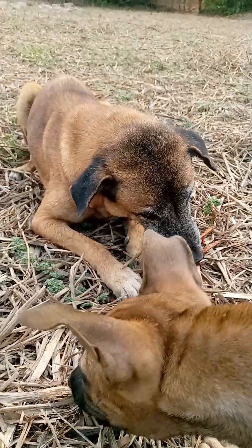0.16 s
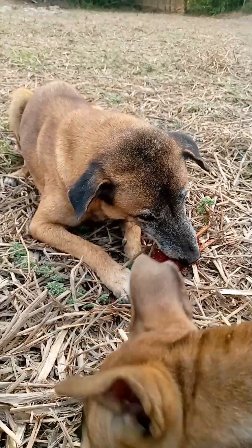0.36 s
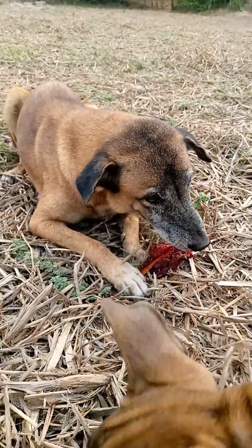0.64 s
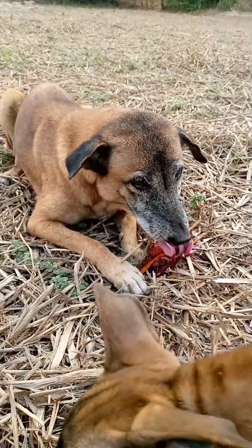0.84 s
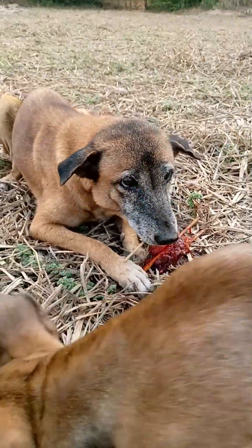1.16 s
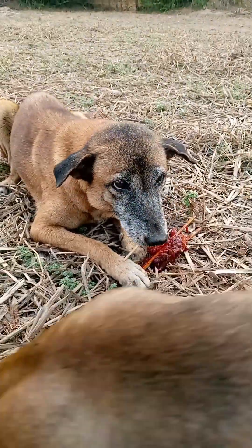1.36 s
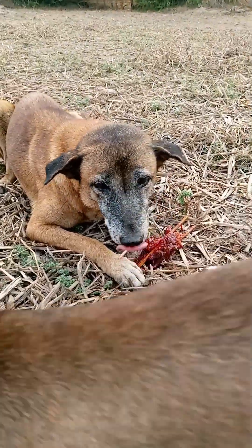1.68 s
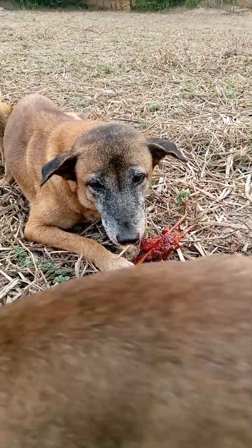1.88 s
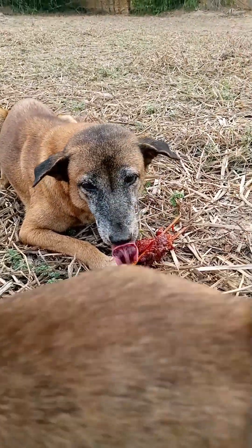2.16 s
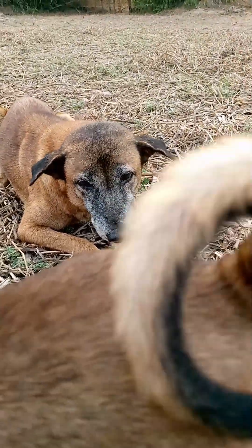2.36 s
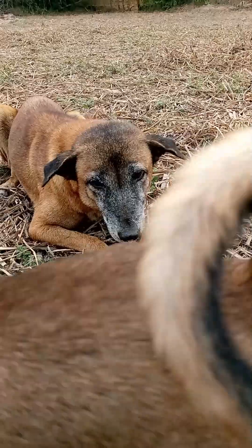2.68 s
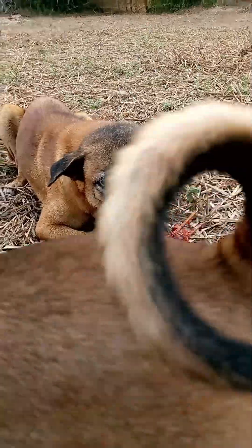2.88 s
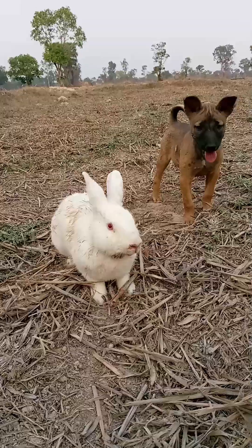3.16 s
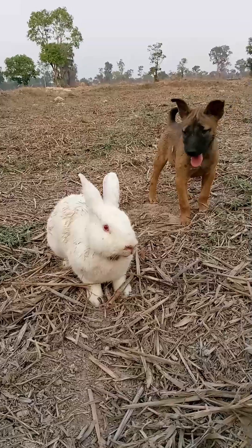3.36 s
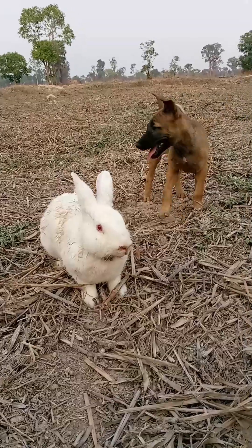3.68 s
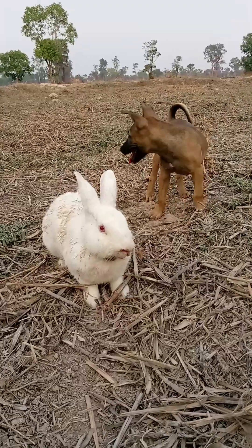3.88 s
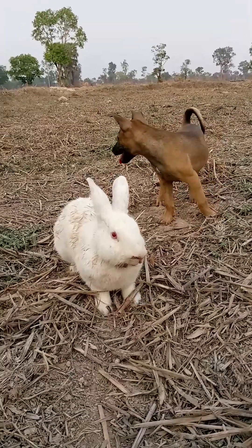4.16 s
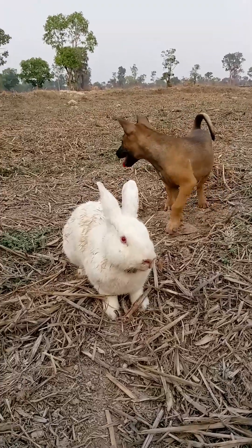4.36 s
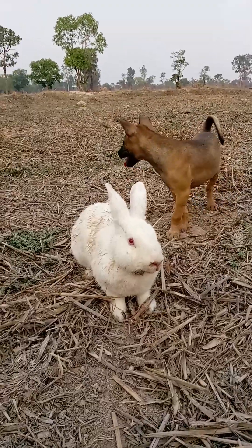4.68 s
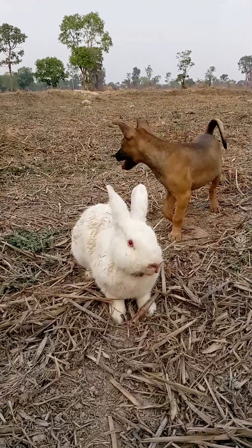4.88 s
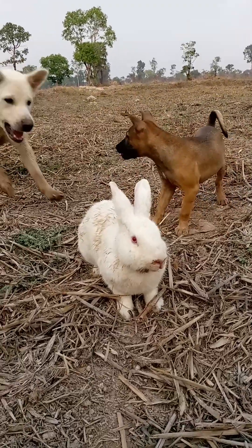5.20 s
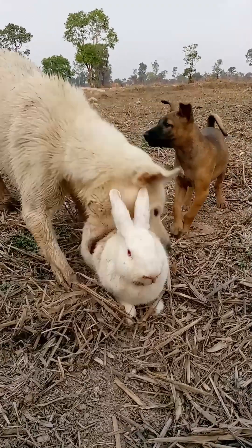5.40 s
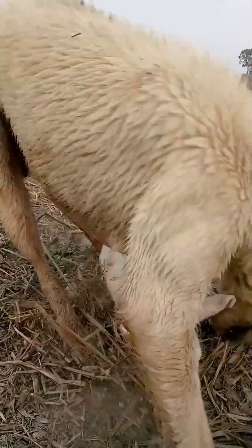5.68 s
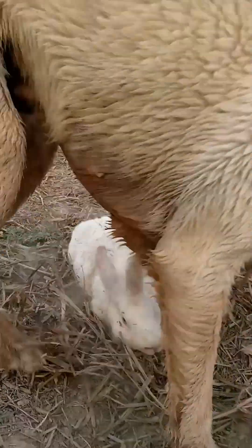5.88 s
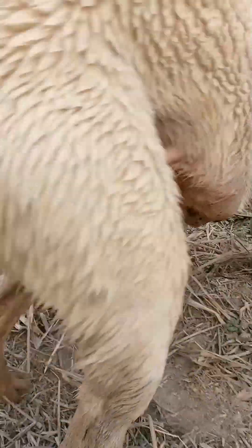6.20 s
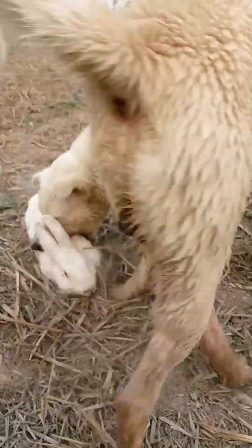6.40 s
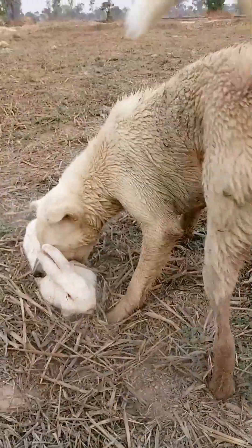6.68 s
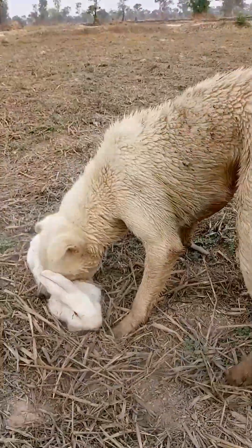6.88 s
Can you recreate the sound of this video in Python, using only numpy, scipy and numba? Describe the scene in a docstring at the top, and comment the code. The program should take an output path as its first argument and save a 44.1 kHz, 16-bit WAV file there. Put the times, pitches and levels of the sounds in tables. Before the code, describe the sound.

Dry straw crackles and crunches as a dog gnaws meat with low grumbles and a bird chirps; later a big dog tramples through loudly.

```python
"""A field of dry straw, with dogs close to a phone. One gnaws at meat while another brushes past with
low grumbles, and a bird repeats a rising chirp. After a short silence the field is quieter, with a puppy
shuffling, until a big dog trots in and crunches through the stalks. Straw, snaps and soil are shaped noise,
clacks are ringing modes, grumbles are throat pulses through resonances and the bird is a gliding sine.
The harder the straw is pressed, the brighter it crackles."""
import sys
import numpy as np
from scipy import signal
from scipy.fft import rfft, irfft, next_fast_len
from scipy.io import wavfile
from scipy.ndimage import uniform_filter1d
from numba import njit

SR = 44100
rng = np.random.default_rng(int(sys.argv[2]) if len(sys.argv) > 2 else 0)


def store_wav(level_fs):
    """Save 16-bit WAV to argv[1]."""
    pcm = np.round(np.clip(np.atleast_2d(level_fs), -1, 1) * 32767)
    wavfile.write(sys.argv[1], SR, pcm.T.astype(np.int16))


N = 310464
TIME = np.arange(N) / SR  # s

# colour of thin straw fibres breaking, as heard through the phone's microphone: f/Hz, level/dB
CRACKLE_COLOUR = [(900, -45), (2000, -14), (3000, -9.5), (3650, -6.5), (4420, -19), (5200, -9.5),
                  (6200, -3.5), (7200, -7), (8300, -12.5), (9700, -4.5), (11000, 1.5), (12200, -7.5),
                  (13700, -19), (15500, -18)]


def straw():
    """Thin fibres crackle brightly; thicker stalks crunch lower, partly in the same breaks; bumps are dull."""
    # constant stirring while the dog feeds, then while the others play: t/s, crackle level before flutter/dB
    stir_feeding = [(0, -42.5), (0.16, -50.5), (0.66, -56), (1.1, -43.5), (1.26, -49), (1.76, -48),
                    (1.88, -50), (2.16, -49.5), (2.4, -56.5), (3.03, -53.5)]
    stir_playing = [(3.17, -66.5), (3.4, -56.5), (3.8, -52.5), (4.25, -58), (5.25, -61.5), (5.5, -38),
                    (5.8, -45), (5.94, -39.5), (6.2, -53), (6.36, -50), (6.47, -44), (6.62, -54),
                    (6.85, -55), (7.04, -50)]
    # bites, tugs and steps that crush the straw: start t/s, length/s, crackle level before flutter/dB
    crushes = [(0.03, 0.058, -41), (0.19, 0.13, -47), (0.718, 0.081, -44), (0.862, 0.052, -38.5),
               (0.92, 0.067, -42.5), (1.349, 0.058, -35), (1.407, 0.064, -34.5), (1.588, 0.1, -39.5),
               (1.953, 0.079, -32.5), (2.166, 0.12, -41.5), (2.605, 0.032, -45.5), (2.841, 0.045, -39),
               (2.916, 0.027, -50), (3.493, 0.089, -50), (3.629, 0.068, -51), (4.008, 0.14, -46.5),
               (4.818, 0.0095, -53.5), (4.96, 0.041, -57), (5.134, 0.046, -51), (5.28, 0.03, -43.5),
               (5.342, 0.037, -39), (5.382, 0.058, -40), (5.563, 0.068, -30), (5.671, 0.023, -28),
               (6.032, 0.036, -34.5), (6.054, 0.055, -31), (6.279, 0.033, -47.5), (6.422, 0.021, -36),
               (6.508, 0.018, -49), (6.662, 0.0099, -43), (6.678, 0.011, -37), (6.749, 0.067, -51),
               (6.867, 0.074, -50)]
    # colour of thick stalks crunching, as heard through the phone's microphone: f/Hz, level/dB
    crunch_colour = [(140, -15), (300, -3.5), (600, -4), (1000, 3), (1600, 3), (3500, 2.5), (4500, -10.5),
                     (8000, -26.5)]
    # hollow resonances as jaws and feet bump the straw: f/Hz, width of each filter stage/Hz, level/dB
    bump_modes = [(324.5, 97, 1), (575, 270, 0.5)]
    rise_share, release_s = 0.3, 0.016  # time constants: build-up per crush length; stalks springing back

    level_db = curves(stir_feeding + stir_playing)[0]
    fidget = flutter(rate=30, db=1.42)  # small shuffles between the crushes
    thin_power = (fidget * undb(level_db)) ** 2
    thick_power = (fidget * undb(stalk_db(level_db))) ** 2
    t = TIME[:SR // 3]
    for start, length, db in crushes:
        build = 1 - np.exp(-t / (rise_share * length))
        release = np.exp(-np.maximum(t - length, 0) / release_s)
        pressure = build * release
        add(thin_power, start, (pressure * undb(db)) ** 2)
        add(thick_power, start, (pressure * undb(stalk_db(db))) ** 2)

    fine = fractures(rate=3600, spread_db=4.4, hiss=.65)
    coarse = fractures(rate=700, spread_db=2.2, hiss=.9) + 0.38 * fine
    crackle = unit(colour(fine, CRACKLE_COLOUR)) * np.sqrt(thin_power) * flutter(rate=120, db=2.0)
    crunch = unit(colour(coarse, crunch_colour)) * undb(-2.0) * flutter(rate=50, db=2.5)
    bumps = unit(resonate(rng.standard_normal(N), bump_modes)) * undb(-10.5) * flutter(rate=45, db=3.5)
    return crackle + (crunch + bumps) * np.sqrt(thick_power)


def stalk_db(crackle_db):
    """Pressure level that drives crunch and bumps; it grows more slowly than the crackle level."""
    firm_db = -46  # crackle level at which the drive lies 10 dB below it
    return firm_db - 10 + 0.5718 * (crackle_db - firm_db)


def fractures(rate, spread_db, hiss):
    """Tiny breaks of very unequal size, about rate a second, over the hiss of rubbing fibres."""
    chance = rng.random(N)
    sizes = undb(spread_db * np.minimum(rng.exponential(size=N), 4))
    clicks = (chance < rate / SR) * sizes * rng.choice([-1, 1], N)
    return unit(unit(clicks) + hiss * rng.standard_normal(N))


def snaps():
    """A brittle break: one sharp spike and a few milliseconds of faint splintering."""
    # single sharp cracks: t/s, peak level/dB, low body before the common 5 dB lift/dB
    cracks = [(0.3241, -18, -14), (0.9068, -18, -18), (1.0724, -24, -14), (1.6522, -22, -14),
              (1.6727, -18, -20), (1.716, -22, -15), (2.2747, -21, -15), (3.213, -42, 12), (3.2594, -38, 3),
              (3.582, -37, 0), (4.681, -37, -22), (5.1061, -34, 7), (5.4613, -23, -16), (5.4825, -25, -18),
              (5.6153, -12, -20), (5.7455, -25, -22), (6.0858, -14, -8), (6.1195, -16, -14),
              (6.1878, -26, -10), (6.212, -33, -14), (6.2668, -27, -12), (6.403, -27, -16)]
    # colour of the sharp top, as heard through the phone's microphone: f/Hz, level/dB
    top_colour = [(2000, -26), (6300, -2), (8300, -5), (11000, 0), (13500, -11), (15500, -12), (17000, -35)]
    # colour of the low body, as heard through the phone's microphone: f/Hz, level/dB
    body_colour = [(500, -22), (1300, -8), (3500, 0), (4400, -11), (5300, -7), (8000, -28)]
    # faint snaps of single fibres at random moments, in the same columns
    twigs = []
    for _ in range(24):
        moment = rng.uniform(0, TIME[-1])
        peak_and_body_db = rng.normal([-45, -8], 3)  # middles and scatter
        twigs.append((moment, *peak_and_body_db))

    out, t = np.zeros(N), TIME[:1024]
    for s, db, body_db in cracks + twigs:
        splintering = .3 * np.exp(-t / .0003) + .03 * np.exp(-t / .002)
        burst = rng.standard_normal(len(t)) * splintering
        burst[0] = 1  # the spike
        crack = colour(burst, top_colour) + undb(body_db + 5) * colour(burst, body_colour)
        add(out, s, crack / np.abs(crack).max() * undb(db))
    return out


def knocks():
    """Teeth and thick stalks clack: splinter, brief scuff, and modes favoured near each clack's own pitch."""
    # hollow clacks: t/s, peak level/dB, favoured pitch f/Hz, bright splintering relative to the ring/dB
    clacks = [(1.758, -40, 700, -10), (2.5285, -25.5, 560, -26), (2.5411, -25, 1430, -32),
              (3.658, -35, 916, -7), (3.666, -34, 1200, -4), (3.682, -35, 1200, -8),
              (3.7185, -29.5, 1150, -4), (3.743, -38, 1200, -9), (3.773, -45, 1500, -1),
              (3.821, -39.5, 1200, -6), (4.029, -42.5, 1450, -12), (4.349, -33.5, 1150, -1),
              (4.407, -37, 1280, 1), (4.523, -38.5, 1910, 3.5)]
    # their ring: f/Hz, t60/s, level before weighting by pitch/dB
    ring_modes = [(565, 0.046, 0), (663, 0.078, -0.5), (1170, 0.004, 13), (1535, 0.048, 5),
                  (1880, 0.017, -1), (2460, 0.022, -9)]
    octaves = 0.29  # distance from the favoured pitch at which the weight halves
    scuff_s, splinter_s = 0.011, 0.0018  # decay time constants

    out, t = np.zeros(N), TIME[:4096]
    dull = signal.butter(4, [350, 2500], "band", fs=SR, output="sos")
    for s, db, centre_hz, splinter_db in clacks:
        ring = 0
        for hz, t60, mode_db in ring_modes:
            weight = undb(mode_db) / (1 + (np.log2(hz / centre_hz) / octaves) ** 2)
            ring = ring + weight * np.sin(2 * np.pi * hz * t) * np.exp(-np.log(1000) * t / t60)
        scuff = signal.sosfilt(dull, rng.standard_normal(len(t)) * np.exp(-t / scuff_s))
        splinter = colour(rng.standard_normal(len(t)) * np.exp(-t / splinter_s), CRACKLE_COLOUR)
        clack = unit(ring) + .33 * unit(scuff) + undb(splinter_db) * unit(splinter)
        add(out, s, clack / np.abs(clack).max() * undb(db))
    return out


def paws():
    """Weight pressed on the soil through the straw gives a dull, short thud."""
    # soft blows of paws: t of the peak/s, level/dB, half length (standard deviation of the swell)/s
    blows = [(1.383, -51, 0.0056), (2.902, -49.5, 0.028), (4.066, -59, 0.012), (4.181, -58, 0.011),
             (5.415, -50, 0.024), (5.522, -40.5, 0.012), (5.567, -43, 0.016), (5.689, -38, 0.0072),
             (6.27, -52, 0.0029), (6.352, -45.5, 0.017), (6.657, -54.5, 0.0044), (6.789, -55.5, 0.013)]
    # colour of the thuds on the soil: f/Hz, level/dB
    soil_colour = [(60, -20), (200, 1.5), (330, 7.5), (560, 5), (850, 1.5), (3000, -49)]
    weight = sum(undb(db) * np.exp(-.5 * ((TIME - s) / half) ** 2) for s, db, half in blows)
    return weight * unit(colour(rng.standard_normal(N), soil_colour))


def grumble():
    """Slack throat pulses, muffled unless the mouth opens and the teeth are bared."""
    # low grumbles: start t/s, swell/s, fade/s, level/dB, mean pulse rate at start, peak and end f/Hz,
    # mouth gain at the end/dB, bared teeth before the mouth opening/dB
    grumbles = [(0.217, 0.11, 0.082, -36, 95.7, 108.8, 85.4, -3.5, -34),
                (0.403, 0.018, 0.09, -38.5, 61.85, 73.8, 121.2, -1.5, -3),
                (0.623, 0.013, 0.05, -38.5, 160.4, 143, 65.8, -9, -30),
                (2.749, 0.11, 0.092, -45.5, 85.96, 91.7, 129, -28, -29)]
    # throat resonances before the shift with effort: f/Hz, width of each filter stage/Hz, level/dB
    throat_modes = [(102, 70, 5.5), (204, 80, 4.5), (272, 49, 2)]
    # mouth resonances before the same shift: f/Hz, width of each filter stage/Hz, level/dB
    mouth_modes = [(570, 123, -2), (930, 40, -9.5)]
    # resonances of the bared teeth, which stay put: f/Hz, width of each filter stage/Hz, level/dB
    teeth_modes = [(1490, 140, -3), (1740, 100, -6)]
    jitter, scatter_db, air_share = .075, 2.4, .38  # unevenness of pulse rate and size; air with them
    arch_power, rise_octaves = 0.77, 0.22  # steepness of swell and fade; resonances rise with the effort
    mouth_opens_db = 7  # from start to end

    out = np.zeros(N)
    for (start, swell, fade, level_db, first_hz, middle_hz, last_hz,
         open_db, teeth_db) in grumbles:
        t = TIME[:int((swell + fade) * SR)]
        along = np.interp(t, [0, swell, swell + fade], [0, .5, 1])
        wander, size, air = rng.standard_normal((3, SR // 2))[:, :len(along)]
        hz = np.interp(along, [0, .5, 1], [first_hz, middle_hz, last_hz])
        uneven_hz = hz * (1 + jitter * unit(uniform_filter1d(wander, size=400)))
        phase = np.cumsum(uneven_hz) / SR
        pulses = np.diff(np.floor(phase), prepend=-1) * undb(scatter_db * size)
        rasp = unit(np.exp(-2 * (phase % 1)) * air)  # air strongest just after each pulse

        effort = np.abs(np.sin(np.pi * along)) ** arch_power
        shift = 2 ** (rise_octaves * (effort - effort.mean()))
        throat = resonate(unit(pulses) + air_share * rasp, throat_modes, shift)
        rough = unit(unit(pulses) + rasp)
        mouth = undb(open_db) * resonate(rough, mouth_modes, shift)
        teeth = undb(teeth_db) * along ** 2 * resonate(rough, teeth_modes)
        voice = throat + undb(mouth_opens_db * (along - 1)) * (mouth + teeth)
        add(out, start, unit(voice * effort) * undb(level_db))
    return out


def bird():
    """A pure whistle slides up and hooks over, far notes glide faintly; the field scatters a short echo."""
    # chirps: t at the loudest point/s, level there/dB, length factor
    chirps = [(0.171, -40, 1.1), (0.582, -37, 0.85), (.962, -37.5, 0.85), (1.327, -37.5, 0.72),
              (1.755, -36.5, 1.1), (2.19, -36.5, 1.1), (2.718, -39, 1.1)]
    # one chirp before stretching and pitch scatter: t from its loudest point/s, f/Hz, level/dB
    chirp_shape = [(-.028, 2580, -31), (-.015, 3100, -17), (-.007, 3400, -3), (.004, 3720, 0),
                   (.012, 4030, -8), (.020, 4350, -11), (.029, 4230, -13), (.038, 3800, -27)]
    # faint far notes: start t/s, length/s, first f/Hz, middle f/Hz, last f/Hz, level before shimmer/dB
    far_notes = [(3.988, 0.065, 5500, 6000, 6960, -58), (4.715, 0.033, 4670, 4050, 3600, -60),
                 (4.726, 0.027, 5300, 4930, 4300, -63), (5.051, 0.052, 4100, 3650, 3400, -66),
                 (5.142, 0.085, 3400, 3860, 5080, -62), (5.243, 0.042, 2950, 3430, 4000, -60)]
    echo_db, echo_t60, echo_rise_s = -8, 0.24, 0.011

    out = np.zeros(N)
    s, hz, db = np.transpose(chirp_shape)
    for peak_s, level_db, stretch in chirps:
        t = np.arange(s[0], s[-1], 1 / (SR * stretch))
        pitch = np.interp(t, s, hz) * rng.normal(1, 0.0097)
        add(out, peak_s + s[0] * stretch, whistle(pitch) * undb(level_db + np.interp(t, s, db)))

    shimmer = flutter(rate=296, db=5.5)  # far notes arrive by many paths and waver
    for start, length, first_hz, middle_hz, last_hz, level_db in far_notes:
        bend = np.polyfit([0, .5, 1], [first_hz, middle_hz, last_hz], 2)
        pitch = np.polyval(bend, np.linspace(0, 1, int(length * SR)))
        envelope = np.sqrt(np.hanning(len(pitch))) * undb(level_db)
        add(out, start, whistle(pitch) * envelope * shimmer[:len(pitch)])

    t = TIME[:SR // 2]
    echo_envelope = np.exp(-np.log(1000) * t / echo_t60) * (1 - np.exp(-t / echo_rise_s))
    scatter = rng.standard_normal(len(t)) * echo_envelope
    echo = signal.fftconvolve(out, scatter / np.linalg.norm(scatter))[:N]
    return out + undb(echo_db) * echo


def field():
    """Distant low rumble and light air: coloured noise that comes in small gusts."""
    # colour of the open field: f/Hz, level/dB
    field_colour = [(20, -19), (45, -16), (65, 5), (105, 1), (215, -3), (300, -15), (450, -16), (1000, -29),
                    (3500, -43.5), (16000, -47)]
    # its loudness through time: t/s, level before gusts/dB
    air_levels = [(0, -52), (1.5, -55), (3, -52.5), (3.2, -62.5), (3.5, -58), (5.6, -54.5), (7, -57)]
    air = unit(colour(rng.standard_normal(N), field_colour))
    return air * undb(curves(air_levels)[0]) * flutter(rate=14, db=3.0)


def undb(db):
    """Decibels to gain."""
    return 10 ** (np.asarray(db) / 20)


def unit(x):
    """Scale to rms 1."""
    return x / np.sqrt(np.mean(x ** 2))


def curves(table):
    """Each column after the times of a table as a line through time."""
    s, *columns = np.transpose(table)
    return [np.interp(TIME, s, c) for c in columns]


def add(out, s, sound):
    """Mix a sound in at time s."""
    start = max(int(s * SR), 0)
    out[start:start + len(sound)] += sound[:N - start]


def flutter(rate, db):
    """A gain that wanders at random, about rate times a second."""
    knots = np.arange(N / SR * rate + 1) / rate
    return undb(db * np.interp(TIME, knots, rng.standard_normal(len(knots))))


def whistle(hz):
    """A pure tone of rms 1 on a moving pitch."""
    return np.sqrt(2) * np.sin(2 * np.pi * np.cumsum(hz) / SR)


def colour(x, points):
    """Causal minimum-phase filter that follows (Hz, dB) points."""
    size = next_fast_len(len(x) + 4096)
    size += size % 2
    hz, db = np.transpose(points)
    bins_hz = np.arange(size // 2 + 1) * SR / size
    log_gain = np.log(undb(np.interp(np.log(bins_hz + 1), np.log(hz), db)))
    cepstrum = irfft(log_gain)
    cepstrum[1:size // 2] *= 2  # fold onto positive time, so nothing sounds early
    cepstrum[size // 2 + 1:] = 0
    return irfft(rfft(x, size) * np.exp(rfft(cepstrum)))[:len(x)]


def resonate(x, modes, shift=1):
    """Steep resonances side by side, each two equal stages, all moved by the factor shift."""
    out = 0
    for hz, width, db in modes:
        centre = hz * shift * np.ones(len(x))
        once = bandpass(x, centre, float(width))
        out = out + undb(db) * bandpass(once, centre, float(width))
    return out


@njit
def bandpass(x, hz, width):
    """A state-variable resonance whose centre may move."""
    out, band, low = np.empty(len(x)), 0., 0.
    for i in range(len(x)):
        g, k = np.tan(np.pi * hz[i] / SR), width / hz[i]
        v = (band + g * (x[i] - low)) / (1 + g * (g + k))
        band, low, out[i] = 2 * v - band, low + 2 * g * v, k * v
    return out


def scene():
    """All sources at one microphone."""
    return (straw() + snaps() + knocks() + paws() + grumble() + bird() + field())[None]


def record(dry):
    """The sound drops out briefly between feeding and playing; the phone cuts the top."""
    # the silence: start t/s, end t/s
    silence = (3.03, 3.165)
    running = (TIME < silence[0]) | (TIME > silence[1])
    top_cut = signal.ellip(10, .2, 80, 15850, fs=SR, output="sos")  # ripple dB, stop dB, edge Hz
    return signal.sosfilt(top_cut, dry * running)


dry = scene()
out = record(dry)
store_wav(out)
```